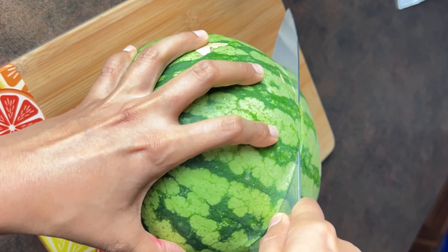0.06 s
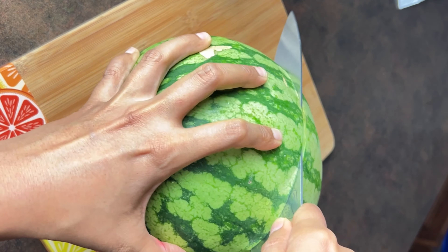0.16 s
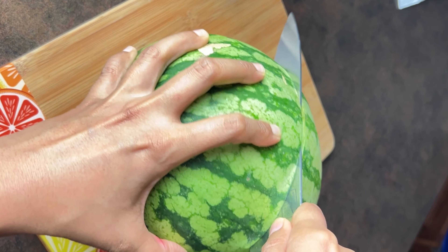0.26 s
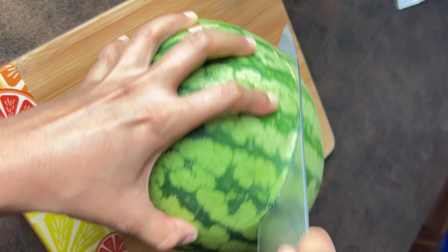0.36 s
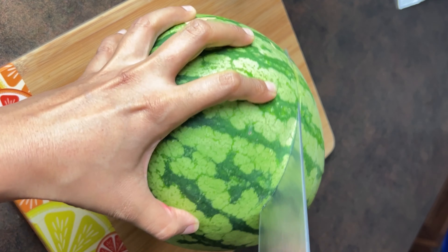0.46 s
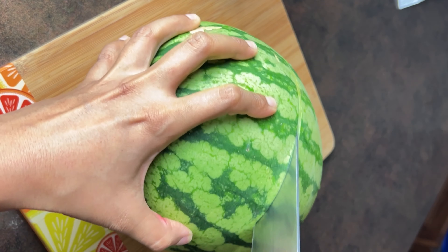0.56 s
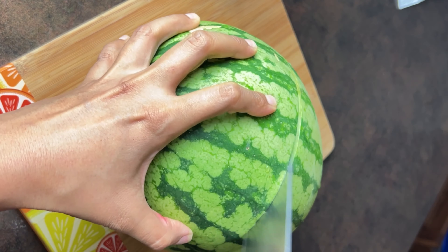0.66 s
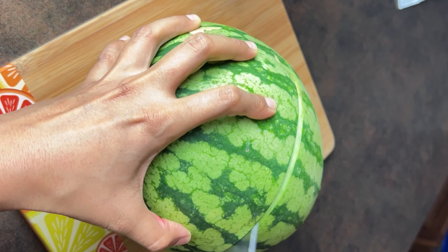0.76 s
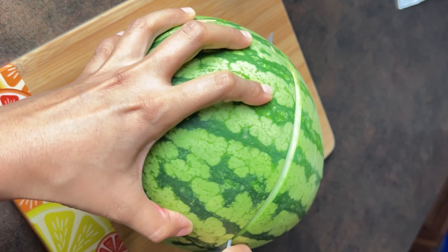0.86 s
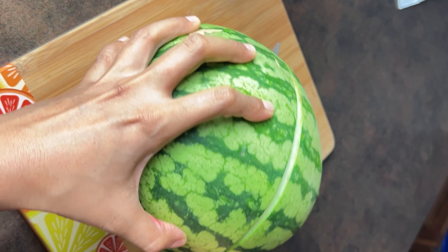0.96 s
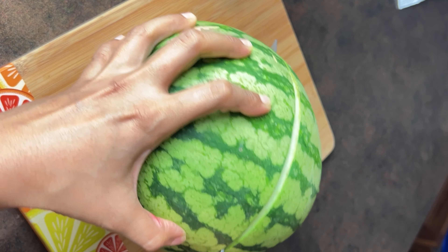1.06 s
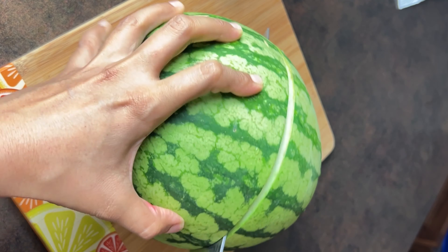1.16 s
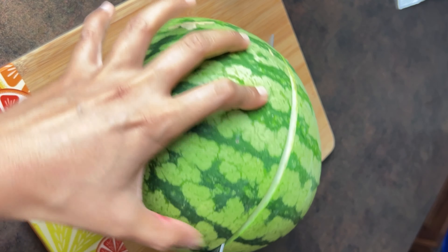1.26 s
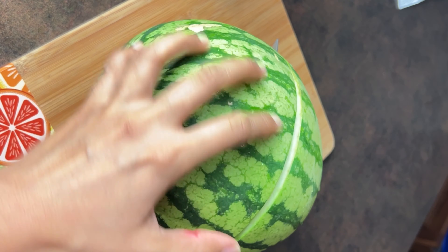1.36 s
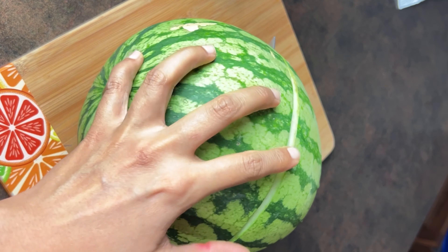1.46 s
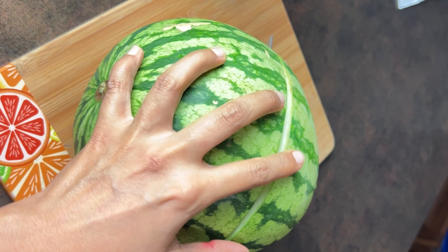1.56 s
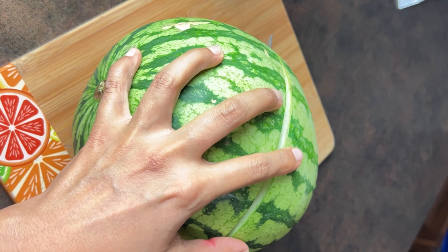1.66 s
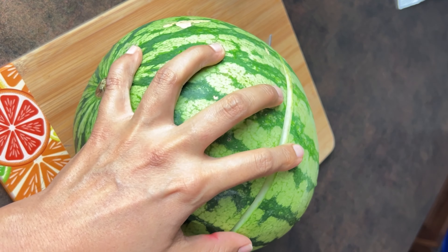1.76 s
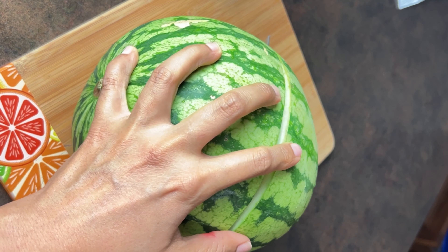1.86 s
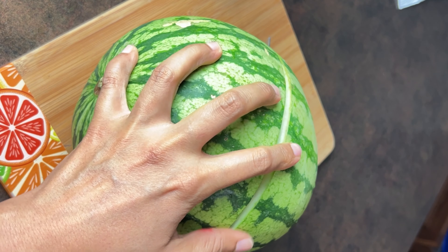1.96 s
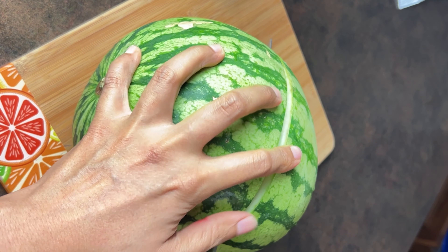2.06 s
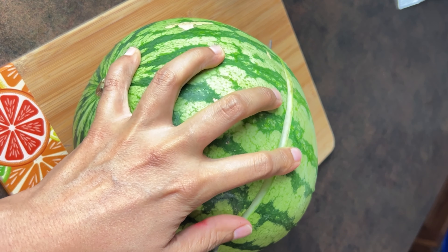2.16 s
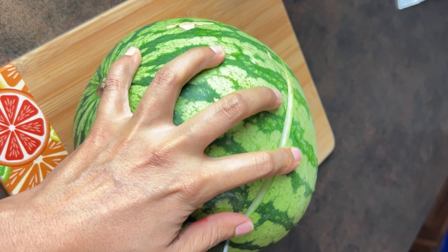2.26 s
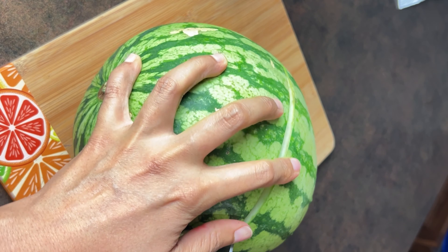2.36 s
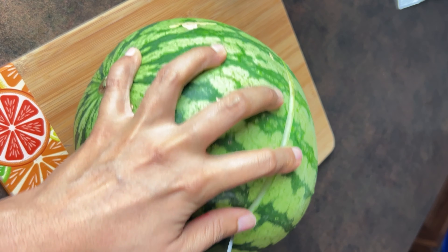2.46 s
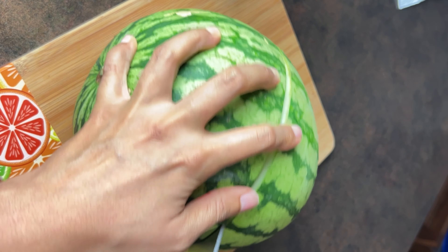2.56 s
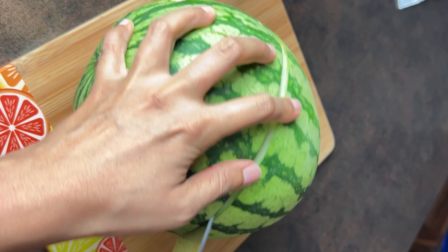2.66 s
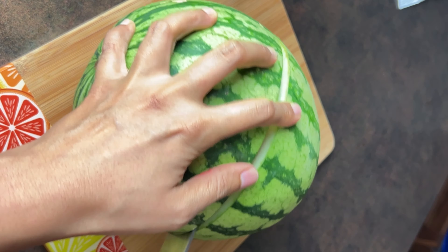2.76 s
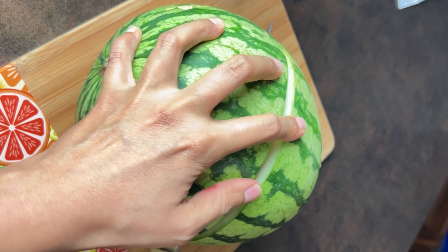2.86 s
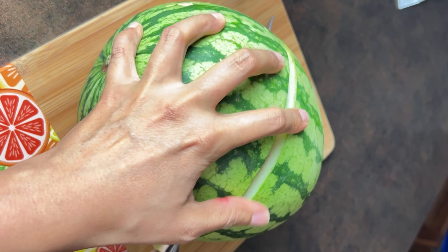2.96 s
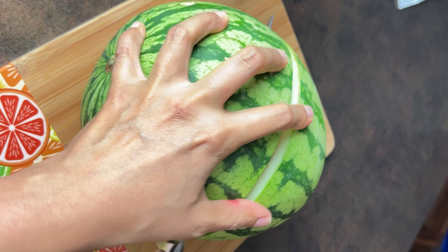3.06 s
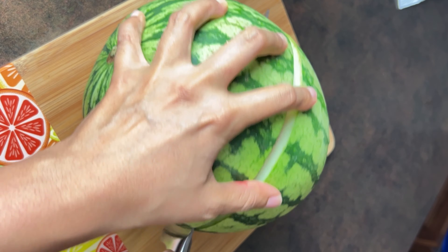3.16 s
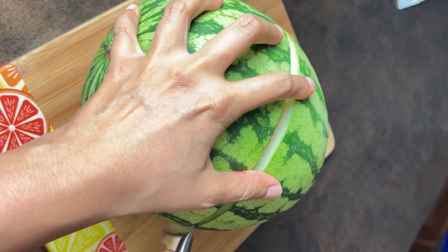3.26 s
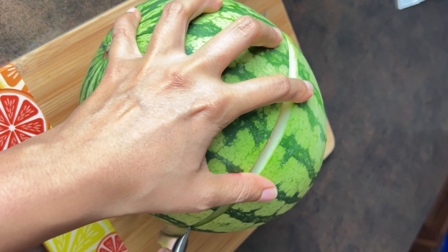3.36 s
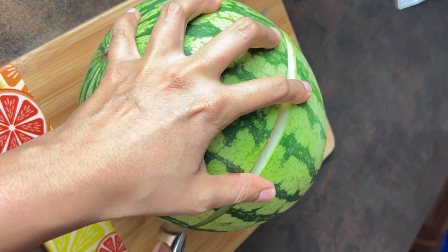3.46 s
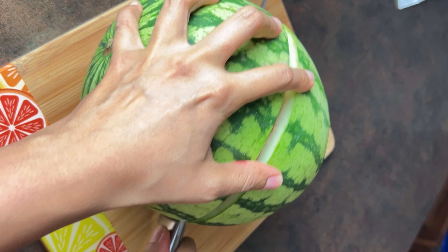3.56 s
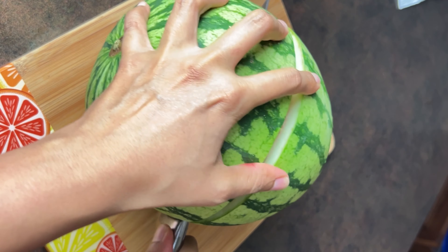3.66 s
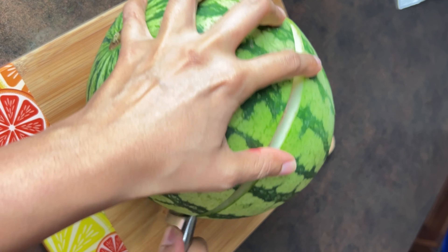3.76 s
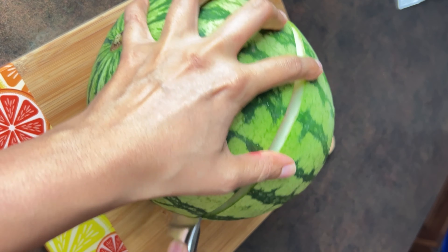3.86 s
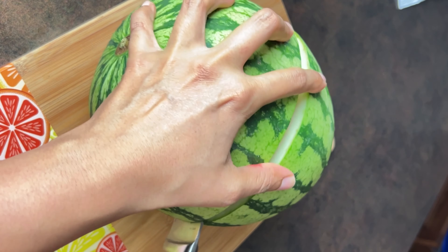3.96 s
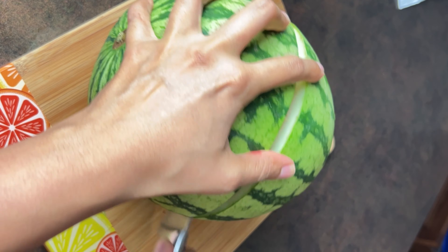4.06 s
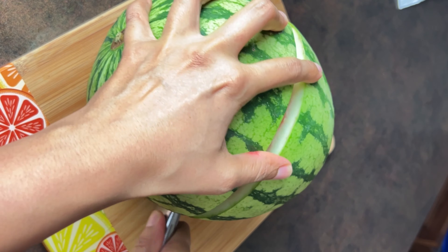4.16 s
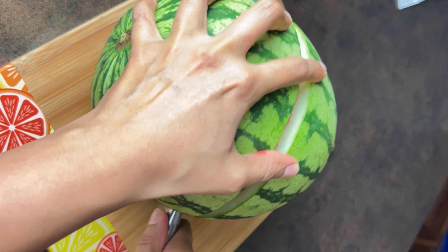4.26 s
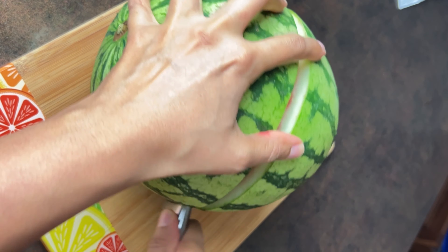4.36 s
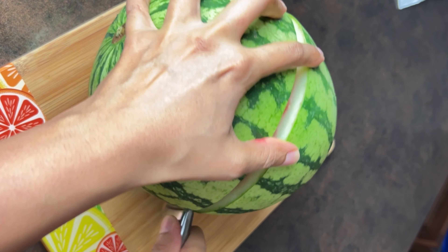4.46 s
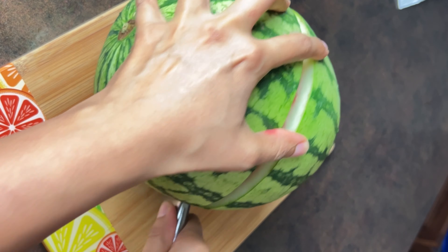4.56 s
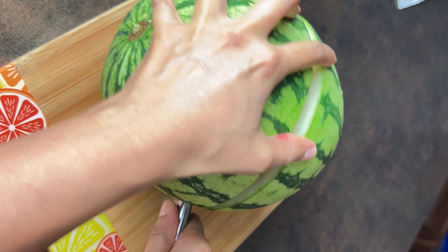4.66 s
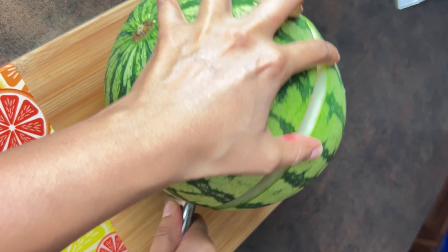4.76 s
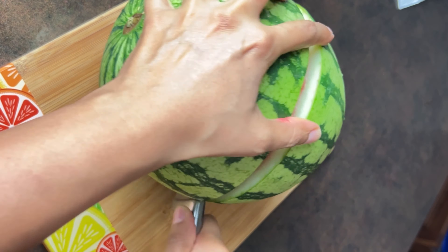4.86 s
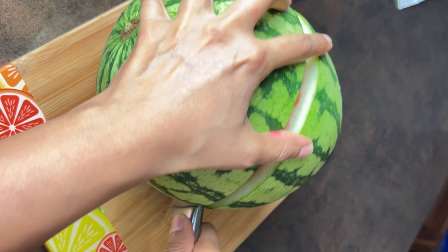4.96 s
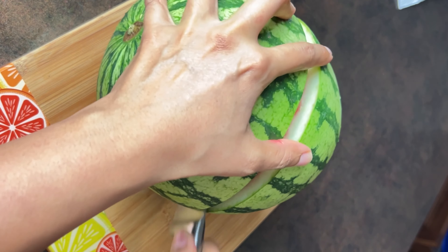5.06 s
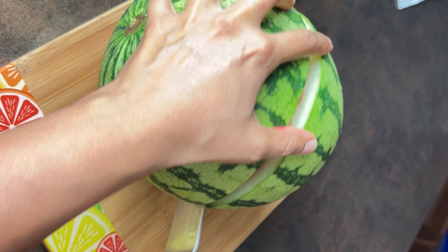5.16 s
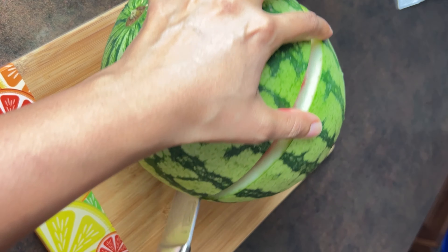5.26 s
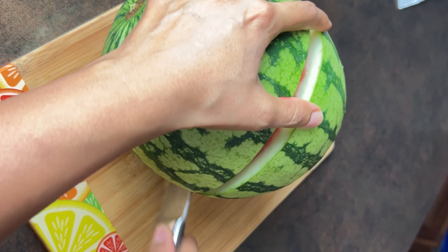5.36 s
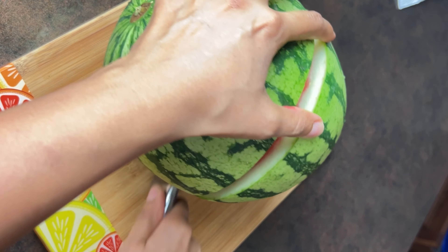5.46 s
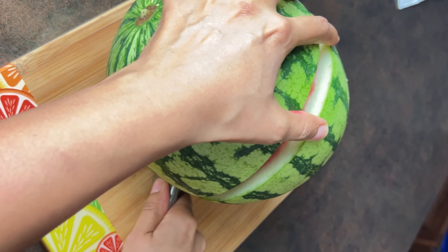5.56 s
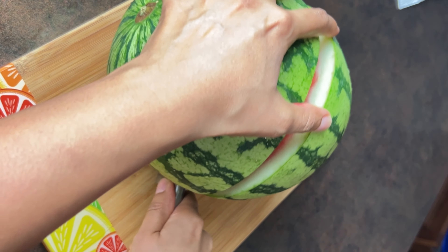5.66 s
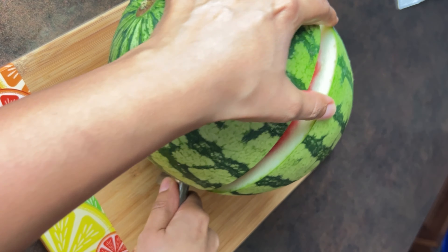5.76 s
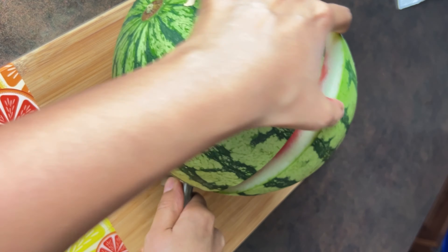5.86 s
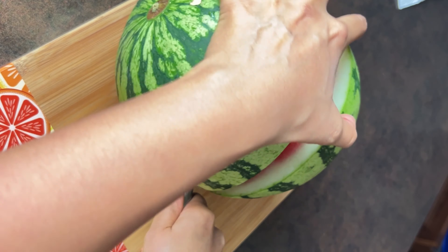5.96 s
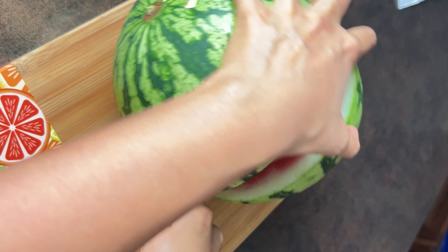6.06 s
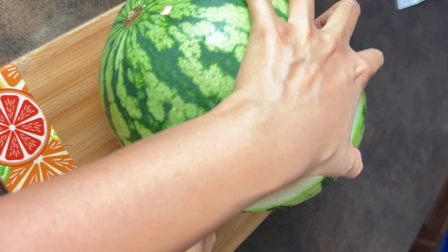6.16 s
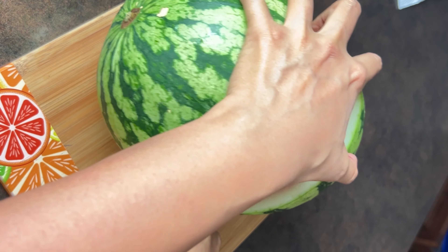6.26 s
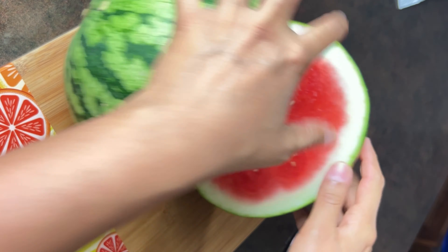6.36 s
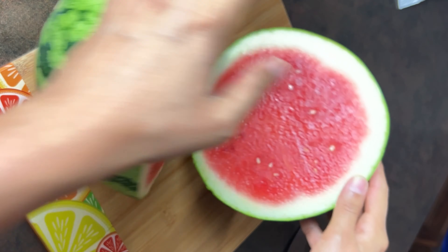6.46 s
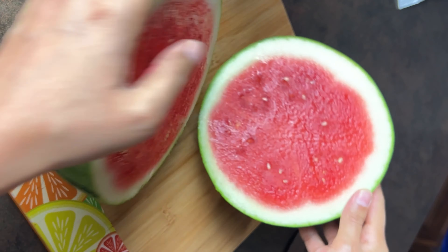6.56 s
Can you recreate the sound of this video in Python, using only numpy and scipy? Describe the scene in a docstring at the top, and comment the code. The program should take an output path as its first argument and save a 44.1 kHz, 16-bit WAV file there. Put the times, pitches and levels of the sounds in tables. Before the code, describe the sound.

A knife cuts a whole watermelon on a wooden board, captured very close in stereo on the same kitchen counter. Low rumbling handling knocks open the scene, with light ticks around 0.3-0.4 s and a bright crackling crunch at 0.6-0.75 s. Faint creaks and low bumps follow until another juicy, snapping stroke at 2.5-2.85 s. At 3.4-3.5 s a crunch ends in a dull wooden thud; harder crunch-and-thud blows land at 4.05-4.1, 4.5 and 5.43 s, the melon sounding hollow, the cabinet booming and the shaken microphone distorting. A tiny squeak slips by at 5.28 s. Fine crackles gather from 5.75 s into the biggest splintering, spraying crack and thud at 5.95-6.08 s. At about 6.25 s wet flesh tears apart with a short airy suck, stopping abruptly at 6.35 s, leaving room hush, low rumble and one faint tick at 6.42 s.

```python
"""Knife through a watermelon

A large knife saws through a watermelon on a wooden board, close to a stereo microphone on the same counter.
Noise and clicks through resonances make crunching rind, fizzing juice, cracks and hollow fruit; blows ring
the board, boom in the cabinet below, and a hard-walled kitchen of decaying taps rings on.
The counter shakes the microphone stand so hard that its low modes, wandering tones, overload the input."""
import sys
import numpy as np
from scipy import signal
from scipy.fft import rfft, irfft
from scipy.io import wavfile
from scipy.ndimage import uniform_filter1d

SR = 44100
rng = np.random.default_rng(int(sys.argv[2]) if len(sys.argv) > 2 else 0)


def master(y):
    """Save y as 16-bit WAV."""
    cut = np.clip(np.atleast_2d(y).T, -1, 1)
    pcm = np.round(cut * 32767)  # scale
    wavfile.write(sys.argv[1], SR, pcm.astype(np.int16))


N = 291853
T = np.arange(N) / SR
T_COARSE = T[::16]  # time grid of the level curves
STOP_S = 6.352  # strokes, parting, cabinet boom and kitchen stop abruptly

# Blade landing on the board. Each row: time in seconds, blow in dB, then in dB above the blow: crush,
# cabinet boom, hollow fruit.
THUDS = [(3.479, -7, -3, -34, -6.5), (3.495, -1, -10, -18, -20), (4.043, -1, -10.5, -16, -12),
         (4.091, 7.5, -15.5, -23, -17.5), (4.508, 5, -10, -24, -18), (5.43, 4.5, -20, -16.5, -13.5),
         (5.958, 1, -1, -22, -23)]
# Resonances of the rind. Each row: frequency in Hz, width in Hz, gain in dB.
RIND = [(1190, 1360, -5.5), (1994, 540, 6), (3420, 3900, -3)]
# Resonances of fizzing juice. Each row: frequency in Hz, width in Hz, gain in dB.
JUICE = [(6560, 6300, 5.5), (8650, 4900, 3.5), (10640, 12000, -32.5)]
# Resonances of fine spray. Each row: frequency in Hz, width in Hz, gain in dB.
SPRAY = [(12340, 1380, -1.5), (16500, 1930, -3.5)]


def amp(db):
    """Amplitude factor of a level in dB."""
    return 10 ** (np.asarray(db) / 20)


def evened(x):
    """Scale to rms 1 over all channels."""
    return x / np.sqrt(np.mean(x ** 2) + 1e-20)


def read(points, hz):
    """Read a (Hz, value) curve on a log frequency axis."""
    point_hz, value = np.transpose(points)
    return np.interp(np.log(hz + 1), np.log(point_hz + 1), value)


def add(mix, start_s, sound):
    """Add a sound into the mix in place, cut at the end of the mix."""
    part = mix[round(start_s * SR):][:len(sound)]
    part += sound[:len(part)]


def resonate(x, modes):
    """Sum of two-pole resonances of alternating sign."""
    out = 0
    for k, (hz, width_hz, db) in enumerate(modes):
        b, a = signal.iirpeak(hz, hz / width_hz, SR)
        out = out + (-1) ** k * amp(db) * signal.lfilter(b, a, x)
    return out


def slow(per_s):
    """Smooth chance of rms 1 that changes about per_s times a second."""
    size = max(int(SR / per_s), 2)
    once = uniform_filter1d(rng.standard_normal(N), size)
    return evened(uniform_filter1d(once, size))


def wobble(hz, waver, throb_db, per_s):
    """A mode kept going by irregular pushes: its pitch and strength wander."""
    turns = np.cumsum(hz * (1 + waver * slow(per_s))) / SR + rng.random()
    return np.sqrt(2) * amp(throb_db * slow(per_s)) * np.cos(2 * np.pi * turns)


def grains(per_s, spread_db, bed):
    """Cells bursting: sparse clicks of uneven size over a bed of hiss."""
    size_db = spread_db * np.minimum(rng.exponential(1, N), 5)
    size = amp(size_db) * rng.choice([-1., 1.], N)
    clicks = evened(size * (rng.random(N) < per_s / SR))
    return evened(clicks + bed * rng.standard_normal(N))


def powers(*levels_db):
    """Levels in dB of unrelated sounds, added as powers."""
    return 10 * np.log10(sum((amp(db) ** 2).sum(0) for db in levels_db))


def peaks_db(peak_s, db, up_db_per_s, down_db_per_s):
    """One row per event: a straight climb in dB to the peak, then a straight fall."""
    late_s = T_COARSE - peak_s[:, None]
    return db[:, None] + np.maximum(np.minimum(up_db_per_s * late_s, -down_db_per_s * late_s), -200)


def full(db):
    """Interpolate a coarse level curve to every sample."""
    return np.interp(T, T_COARSE, db)


def cutting():
    """Levels of crunch, fizz, spray and fruit: strokes climb, hold and fade; bursts and creaking join them."""
    # Strokes of the blade. Each row: start in seconds, climb in seconds, hold in seconds, rind crunch in dB,
    # then in dB above the crunch: juice fizz, fine spray, hollow fruit.
    stroke_rows = [(0.0, 0.0014, 0.0067, -35, -6.5, -20, -1.5), (0.198, 0.028, .04, -49.5, 3, -7, -6),
                   (0.276, 0.009, 0.076, -39.5, -10, -16, -3.5), (0.565, 0.044, .15, -27.5, -4.5, -9.5, 0),
                   (2.115, 0.024, 0.08, -48.5, 0, -11, -1), (2.559, 0.025, 0.26, -30, -7, -8, -5.5),
                   (3.367, 0.14, 0.034, -27.5, -6.5, -13.5, 1.5), (3.773, 0.031, 0.036, -52.5, 3, 0, -7),
                   (3.991, 0.0055, .02, -38.5, -17, -25, -8), (4.008, 0.021, 0.062, -24, 1.5, -5, -6),
                   (4.448, 0.014, .05, -30.5, 2, 0, 4), (4.93, 0.034, 0.074, -52.5, 5, 0, -1),
                   (5.275, 0.0068, 0.066, -38, 4, -4, 1), (5.313, 0.074, .02, -26.5, -0.5, 0.5, 1),
                   (5.364, 0.038, 0.0046, -19.5, -13, -11, -12), (5.736, 0.015, 0.11, -44.5, -1, -2, -4),
                   (5.923, 0.019, 0.0037, -16.5, -8.5, 1, -11), (5.978, 0.081, 0.054, -27, -13, -27, 4),
                   (6.206, 0.037, 0.02, -37.5, -4, -8, 7.5)]
    # Rind giving way in bursts. Each row: peak in seconds, crunch in dB, then in dB above it: fizz, spray.
    burst_rows = [(0.642, -20, -20, -18), (0.718, -19, 2, 0), (2.666, -23.5, -23, -20),
                  (2.819, -22, -2, -7), (3.485, -15.5, -27, -28), (4.048, -10, -24, -21),
                  (4.064, -11, -21, -21), (4.094, -11, -22, -5.5), (4.509, -12, -26, -28),
                  (5.433, -11, -14, -4), (5.954, -8.5, 3, 10.5), (6.076, -11.5, -18, -16)]
    # Faint creaking of the wedged blade. Each row: time in seconds, crunch in dB, fizz in dB above it.
    creak_points = [(0, -40, -8), (.28, -62.5, -10), (0.902, -51.5, 2.5), (1.3, -73, -6), (2.1, -71, -1),
                    (2.3, -55, -1.5), (3.05, -55, -3.5), (3.351, -68, 4), (3.65, -45.5, -3),
                    (3.95, -56.5, -5), (4.2, -32.5, -2), (4.42, -43.5, -11.5), (4.6, -48.5, -0.5),
                    (5.2, -51.5, -2.5), (5.6, -42, -7.5), (5.9, -58, 1), (6.36, -52, 2), (6.62, -52.5, -7)]
    bite_db, let_go_db_per_s = -17, 178  # stroke onset re its full level; fade speed
    fruit_burst_db, creak_spray_db = -0.5, -7  # fruit above burst crunch; spray above creak fizz

    start_s, climb_s, hold_s, stroke_db, *stroke_above = np.transpose(stroke_rows)[:, :, None]
    late_s = T_COARSE - start_s
    climb_db = bite_db * np.clip(1 - late_s / climb_s, 0, 1)
    fade_db = let_go_db_per_s * np.maximum(late_s - climb_s - hold_s, 0)
    sounding = (late_s >= 0) & (T_COARSE < STOP_S)
    strokes = np.where(sounding, stroke_db + climb_db - fade_db, -200)

    peak_s, burst_db, *burst_above = np.transpose(burst_rows)[:, :, None]
    bursts = peaks_db(peak_s[:, 0], burst_db[:, 0], up_db_per_s=2500, down_db_per_s=803)

    point_s, creak_db, fizz_db = np.transpose(creak_points)
    creak = np.interp(T_COARSE, point_s, creak_db)[None]
    fizz_db = np.interp(T_COARSE, point_s, fizz_db)

    above = zip([0, *stroke_above], [0, *burst_above, fruit_burst_db],
                (0, fizz_db, fizz_db + creak_spray_db, 0))
    return [full(powers(strokes + a, bursts + b, creak + c)) for a, b, c in above]


def hush():
    """Quiet room noise, partly shared by the two capsules."""
    # Noise spectrum. Each row: frequency in Hz, relative density in dB per Hz.
    spectrum = [(59, -46), (100, 7.5), (193, -13), (238, -6.5), (364, -7.5), (441, -5), (568, -13),
                (797, -15.5), (1350, -19.5), (1570, -28), (15800, -44)]
    shared, left, right = rng.standard_normal((3, N))
    pair = shared + np.array([left, right])
    colour = amp(read(spectrum, np.fft.rfftfreq(N, 1 / SR)))
    level_db = -42.5 + 0.23 * slow(17)
    return amp(level_db) * evened(irfft(rfft(pair) * colour, N))


def kitchen(x):
    """Room tail: sparse taps of random sign after a short gap, each band dying at its own speed."""
    # Decay of the room. Each row: frequency in Hz, T60 in seconds.
    decay = [(200, .35), (700, .75), (2000, .75), (6000, .55), (12000, .3)]
    taps = np.zeros((2, SR))
    at = np.arange(300, SR - 20, 20) + rng.integers(0, 20, (2, (SR - 301) // 20))
    np.put_along_axis(taps, at, rng.choice([-1., 1.], at.shape), 1)
    hz, t, bands = signal.stft(taps, SR, nperseg=256)
    fall = amp(-60 * t / read(decay, hz)[:, None])
    tail = signal.istft(bands * fall, SR, nperseg=256)[1]
    tail = tail / np.linalg.norm(tail[0])
    return signal.fftconvolve(x[None], tail, axes=1)[:, :N] * (T < STOP_S)


def shaking():
    """Levels of bounce and rocking, pitch of the rocking, level of the buzz."""
    # Jolts reaching the stand through the counter. Each row: peak in seconds, bounce in dB, rocking in dB,
    # counter buzz in dB (before rounding and the capsule mix).
    jolt_rows = [(0.018, -8, -13.5, -21.5), (0.1, -17, -28, -26), (0.33, -18.5, -13, -27.5),
                 (0.68, -18.5, -14, -14.5), (0.74, -14.5, -4, -13.5), (0.776, -8.5, -5, -28),
                 (0.83, -7.5, -35, -38), (1.068, -18.5, -12.5, -41), (1.228, -17.5, -14.5, -32),
                 (1.36, -29, -37, -51), (1.95, -24, -23, -55), (2.174, -31, -20.5, -37.5),
                 (2.602, -25, -8.5, -24), (2.67, -30, -11, -18), (2.729, -23, -2.5, -35),
                 (2.8, -26, -13, -24), (2.865, -13, -6.5, -24), (2.99, -19.5, -28, -58),
                 (3.39, -16, -14, -26.5), (3.48, -20, -10, -16), (3.528, -13, 1.5, -30),
                 (3.68, -22, -32, -54), (3.9, -26.5, -43, -53), (3.97, -25, -23, -43), (4.059, -38, -5, -4),
                 (4.118, -13, 6, -9), (4.179, -9.5, -1.5, -19), (4.25, -27, -25, -38),
                 (4.35, -19, -14, -33), (4.429, -23.5, -18, -42), (4.522, -13.5, 2.5, -4.5),
                 (4.58, -15.5, -5, -26), (4.789, -29, -31, -25), (4.824, -30, -9.5, -40),
                 (5.21, -26, -32, -51), (5.316, -15, -7.5, -18.5), (5.452, -12.5, 1.5, -7.5),
                 (5.5, -19, -11, -16), (5.63, -22, -35, -36), (5.76, -18.5, -28, -41),
                 (5.87, -19, -36, -34), (5.976, -8, 5.5, -4.5), (6.02, 0.5, -6.5, -11.5),
                 (6.1, -33, 1.5, -16), (6.2, -22, -22, -30.5), (6.28, -21.5, -37, -42),
                 (6.45, -18, -25, -25)]
    # Resting pitch of the rocking, drifting as the weight on the counter shifts. Each row: time in seconds,
    # frequency in Hz.
    rock_pitch = [(0, 86.1), (.75, 88), (1.2, 84), (2.6, 89), (2.9, 90.97), (3.5, 83.2), (4.1, 84.2),
                  (4.6, 83.19), (4.85, 88.94), (5.4, 88), (5.6, 86), (6.0, 90.07), (6.15, 90.1),
                  (6.6, 82.77)]
    # per mode: bounce, rocking, buzz
    up_db_per_s, down_db_per_s = (406, 735, 800), (89, 196, 320)
    idle_db, sawing_db = (-40, -45, -81), (1, 9.5, -0.5)  # at rest; kept up by the blade, above its crunch
    rounding_s = 0.027  # a mode cannot follow a jolt faster than this

    peak_s, *peaks = np.transpose(jolt_rows)
    crunch_db = cutting()[0][None, ::16]
    levels = []
    for db, up, down, idle, saw in zip(peaks, up_db_per_s, down_db_per_s, idle_db, sawing_db):
        level_db = full(powers(peaks_db(peak_s, db, up, down), crunch_db + saw, [[idle]]))
        levels.append(uniform_filter1d(level_db, int(rounding_s * SR)))
    bounce_db, rock_db, buzz_db = levels
    return bounce_db, rock_db, np.interp(T, *np.transpose(rock_pitch)), buzz_db


def stand():
    """Bounce moves both capsules alike, rocking moves them oppositely, the left more at higher pitch."""
    bounce_db, rock_db, rock_hz, buzz_db = shaking()
    bounce = amp(bounce_db) * wobble(46, waver=0.071, throb_db=0.5, per_s=20.9)
    rock = amp(rock_db) * wobble(rock_hz, waver=0.0421, throb_db=2.5, per_s=26.58)
    buzz = amp(buzz_db) * np.array([wobble(150, waver=0.13, throb_db=3.5, per_s=52.0) for _ in range(2)])
    lean = np.clip(0.027 * (rock_hz - 74), -.2, .6)
    # the loose mount shudders each capsule apart
    low_band = signal.butter(2, [22, 60], "bandpass", fs=SR, output="sos")
    rumble = evened(signal.sosfilt(low_band, rng.standard_normal((2, N))))
    loose = amp(bounce_db - 5.5) * rumble + amp(-49.5) * rumble[::-1]
    left = 1.15 * bounce + (1 + lean) * rock + 0.62 * buzz[0] + 0.12 * buzz[1]
    right = 0.5 * bounce - (1 - lean) * rock + 0.72 * buzz[0] - 0.43 * buzz[1]
    return loose + np.array([left, right])


def cabinet():
    """Each blow leaves the hollow cabinet booming: many close modes, heard as noise dying in its resonances."""
    # Resonances under the counter. Each row: frequency in Hz, width in Hz, gain in dB per pass.
    boom_modes = [(440, 166, -2.5), (703, 226, -0.5), (932, 116, 1.5), (1570, 630, -5.5), (2210, 730, -31)]
    t60_s, rise_s, t = 0.75, 0.0023, T[:SR]
    power = np.zeros(N)
    for start_s, blow_db, _, boom_db, _ in THUDS:
        fall = amp(2 * (blow_db + boom_db) - 120 * t / t60_s)
        add(power, start_s, fall * np.minimum(t / rise_s, 1))
    shared, left, right = rng.standard_normal((3, N))
    pair = 0.93 * shared + np.array([left, right])
    # two passes in series, the second without the lowest mode
    boom = np.array([resonate(resonate(x, boom_modes), boom_modes[1:]) for x in pair])
    return np.sqrt(power) * evened(boom) * (T < STOP_S)


def fruit():
    """The whole hollow fruit sounds under the blade and after each blow, wide enough to differ at the capsules."""
    # Resonances of the hollow fruit. Each row: frequency in Hz, width in Hz, gain in dB.
    hollow_modes = [(305, 127, -3), (444, 305, -6), (693, 332, -5)]
    idle_db, t60_s, lag_s = -49.5, 0.33, 0.0031  # level at rest; decay and peak delay after a blow
    blow_s, blow_db, *_, ring_db = np.transpose(THUDS)
    blows = peaks_db(blow_s + lag_s, blow_db + ring_db, 2000, 60 / t60_s)
    body_db = full(powers(blows, cutting()[3][None, ::16], [[idle_db]]))
    shared, left, right = (grains(300, spread_db=2.75, bed=0.57) for _ in range(3))
    pair = np.array([resonate(.5 * shared + own, hollow_modes) for own in (left, right)])
    return amp(body_db) * evened(pair)


def capsules(near):
    """The sound reaches the left capsule first; each capsule hears its own dull reflections and shadow."""
    # First reflections off board and hands. Each row: left delay in seconds, left level in dB, right delay in
    # seconds, right level in dB.
    reflections = [(.0022, -11, 0.0028, -12), (.0047, -6, .0061, -25.5)]
    # Capsules facing apart. Each row: frequency in Hz, left over right in dB.
    shadow = [(60, 22.5), (150, 2.5), (380, -13), (950, 15.5), (2380, 2), (5980, -2.5), (15000, 3)]
    left_lead_s = 0.0001
    dull = signal.lfilter(*signal.butter(1, 1500, fs=SR), near)
    echoes = np.zeros((2, N))
    for left_s, left_db, right_s, right_db in reflections:
        add(echoes[0], left_s, amp(left_db) * dull)
        add(echoes[1], right_s, amp(right_db) * dull)
    hz = np.fft.rfftfreq(N, 1 / SR)
    tilt_db = read(shadow, hz) / 2
    late = np.exp(-2j * np.pi * hz * left_lead_s)
    return irfft(rfft(near + echoes) * [amp(tilt_db), amp(-tilt_db) * late], N)


def parting():
    """The slice is pulled off: wet flesh tears apart and sucks air into the gap."""
    # Air in the opening cut. Each row: frequency in Hz, width in Hz, gain in dB.
    gap_modes = [(317, 92, 1.5), (774, 63, 0), (1075, 140, -3), (2960, 1260, -8), (7540, 3200, -18.5),
                 (13500, 2900, -19)]
    start_s, loudest_s, end_s, level_db = 6.236, 6.262, 6.39, -22
    swell = np.interp(T, [start_s, loudest_s, end_s], [0, 1, 0]) * (T < STOP_S)
    return amp(level_db) * swell * evened(resonate(grains(1000, spread_db=4.7, bed=0.96), gap_modes))


def squeak():
    """The blade skids on wet rind: one short tone."""
    start_s, length_s, hz, level_db = 5.277, .016, 3080, -31
    swell = np.sin(np.pi * np.clip((T - start_s) / length_s, 0, 1)) ** 2
    return amp(level_db) * swell * np.sin(2 * np.pi * hz * T)


def thuds():
    """A blow rings the board modes, each a little detuned by where the blade lands, and crushes the last rind."""
    # Modes of the board. Each row: frequency in Hz, relative level in dB, T60 in seconds.
    board_modes = [(132.7, 12, 0.14), (246, 3.5, 0.093), (334, -1, 0.16), (423.7, -5.5, 0.21),
                   (646, -4, 0.037), (747, 0, 0.17), (883, -6, 0.13), (1590, -12, 0.01)]
    crush_t60_s = 0.037
    out, t = np.zeros(N), T[:12000]
    detune = rng.uniform(0.9, 1.023, (len(THUDS), len(board_modes)))
    noise = rng.standard_normal((len(THUDS), len(t)))
    crush = evened(resonate(noise, RIND)) + 0.087 * noise
    hz, db, t60_s = np.transpose(board_modes)[:, :, None]
    for (start_s, blow_db, crush_db, *_), shift, grit in zip(THUDS, detune, crush):
        tones = np.sin(2 * np.pi * hz * shift[:, None] * t)
        ring = (amp(db - 60 * t / t60_s) * tones).sum(0)
        ring = ring / abs(ring).max()
        add(out, start_s, amp(blow_db) * (ring + amp(crush_db - 60 * t / crush_t60_s) * grit))
    return out


def cracks():
    """Each crack is a short puff of noise through the juice and one snap that rings the rind."""
    # Single cracks of the rind. Each row: time in seconds, drive in dB, dull snap in dB above it, fine part in
    # dB above it.
    crack_rows = [(0.287, -32, 8, -18), (0.3954, -30, -11, -19), (0.4128, -25, -17, -26),
                  (0.4718, -43, -12, -33), (0.6056, -10.5, -13, -21), (0.6407, -26, 16, -14),
                  (0.7033, -5, -14, -23), (0.7146, 2.5, -21, -21), (1.2067, -39.5, 9, -3),
                  (2.128, -38, -13, -18.5), (2.1493, -38, 7, -21), (2.1868, -41, -14, -23),
                  (2.399, -41, 7, -20), (2.528, -23.5, -6, -3), (2.568, -29, -2, -10), (2.6633, -38, 5, -9),
                  (2.6768, -8, -3, -2), (2.769, -13.5, 3, -20), (2.7955, -6, -19, -12),
                  (2.816, -14, -3, -16), (3.3747, -35.5, 13.5, -8), (3.8191, -30, -10, -22),
                  (4.0174, -1.5, -22, -8), (4.45, -12, -13, 7.5), (4.9446, -31, -26, -23.5),
                  (5.098, -35, -17, -6), (5.246, -31, -5, 6), (5.285, -37, -15, -3), (5.3785, -13, -15, -6),
                  (5.6064, -24, -5, -15), (5.747, -30, -6, 0), (5.8, -29.5, -9, 5), (5.8334, -26, -18, 5),
                  (5.8699, -29, -13, 10), (5.891, -16, -14, 4), (5.9067, -18, -18, -9),
                  (5.916, -22, -14, 5), (5.9454, 8.5, -6, -22), (5.9997, -11, -18, 10),
                  (6.0372, -7, -15, 4), (6.051, -21, -11, -6), (6.0545, -3, -20, 12.5),
                  (6.0676, -15, -10, -4), (6.0723, 5.5, -22, 0), (6.422, -32, -10, 6)]
    rise_s, t60_s = 0.00037, 0.011
    bright, fine, snaps, t = np.zeros(N), np.zeros(N), np.zeros(N), T[:2000]
    snap = resonate(np.exp(-t / .0001), RIND)
    snap = snap / abs(snap).max()
    noise = rng.standard_normal((len(crack_rows), len(t)))
    for (start_s, db, low_db, high_db), hiss in zip(crack_rows, noise):
        puff = hiss * amp(db - 60 * t / t60_s) * np.minimum(t / rise_s, 1)
        add(bright, start_s, puff)
        add(fine, start_s, puff * amp(high_db))
        add(snaps, start_s, amp(db + low_db) * snap)
    return amp(1.5) * (resonate(bright, JUICE) - resonate(fine, SPRAY)) + snaps


def blade():
    """Tearing rind and fizzing juice, driven by bursting cells."""
    crunch_db, fizz_db, spray_db, _ = cutting()
    slips = amp(1.0 * slow(64))  # the blade sticks and slips
    tearing = resonate(grains(900, spread_db=2.93, bed=0.9), RIND)
    crunch = evened(signal.lfilter(*signal.butter(2, 4200, fs=SR), tearing))
    cells = grains(550, spread_db=6.4, bed=1.6)
    fizz = evened(resonate(cells, JUICE))
    spray = evened(resonate(cells, SPRAY))
    return slips * (amp(crunch_db) * crunch + amp(fizz_db) * fizz - amp(spray_db) * spray)


def scene():
    """Close sounds through the capsules, plus fruit, room, cabinet, hush and the shaken stand."""
    near = blade() + cracks() + squeak() + parting() + thuds()
    return capsules(near) + fruit() + amp(-10.5) * kitchen(near) + cabinet() + hush() + stand()


def record(dry):
    """The input clips hard at full scale, then a steep low-pass limits the band."""
    clipped = np.clip(dry, -1, 1)
    low_pass = signal.firwin(511, 15800, window=("kaiser", 9), fs=SR)
    return np.clip(signal.oaconvolve(clipped, low_pass[None], "same"), -1, 1)


dry = scene()
out = record(dry)
master(out)
```